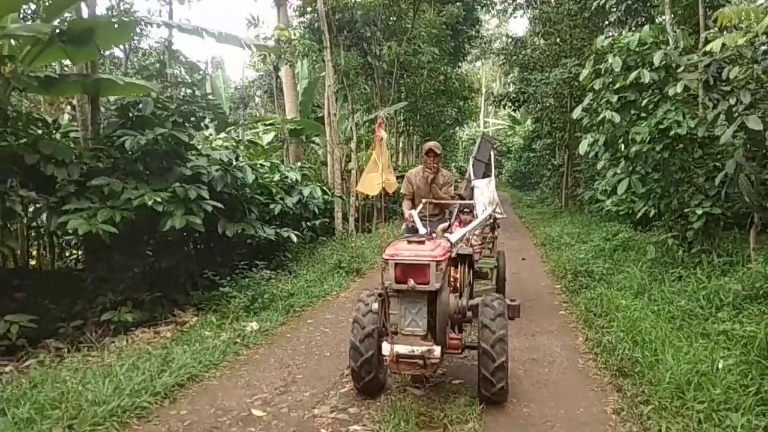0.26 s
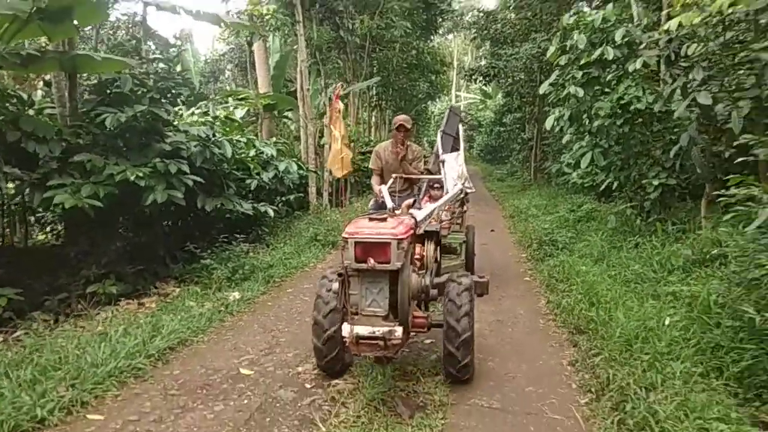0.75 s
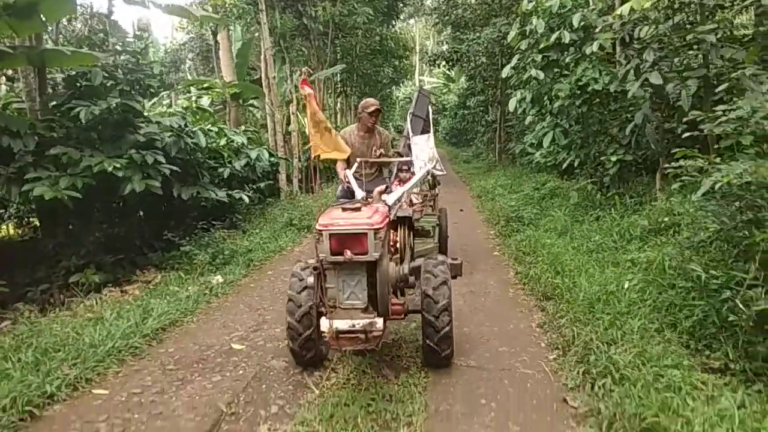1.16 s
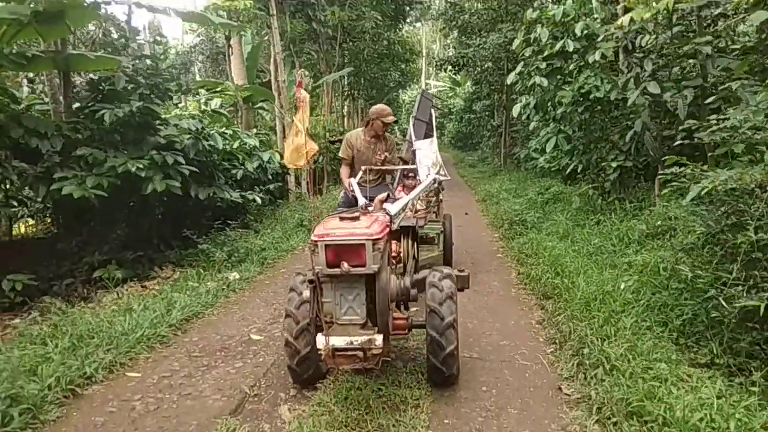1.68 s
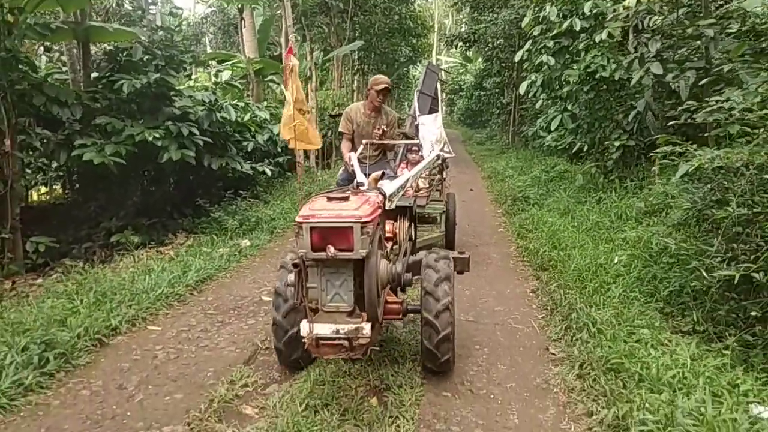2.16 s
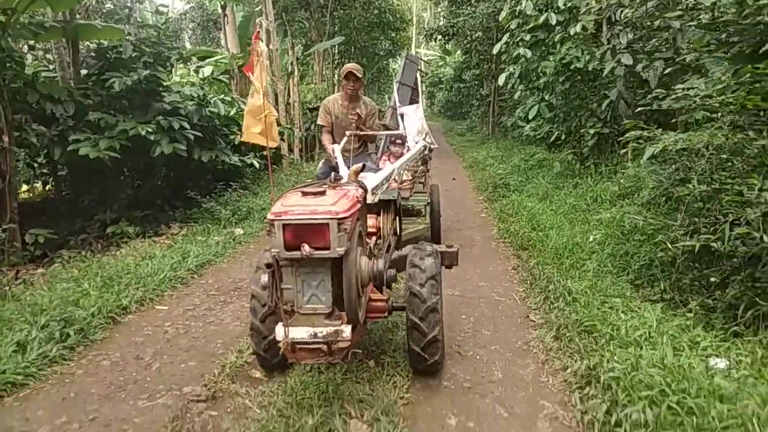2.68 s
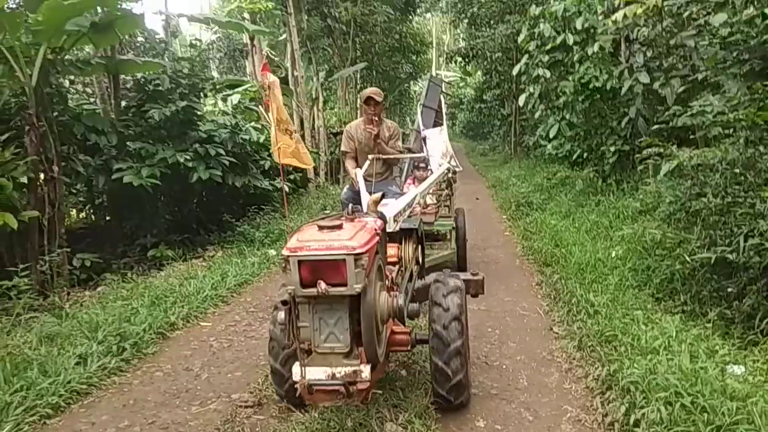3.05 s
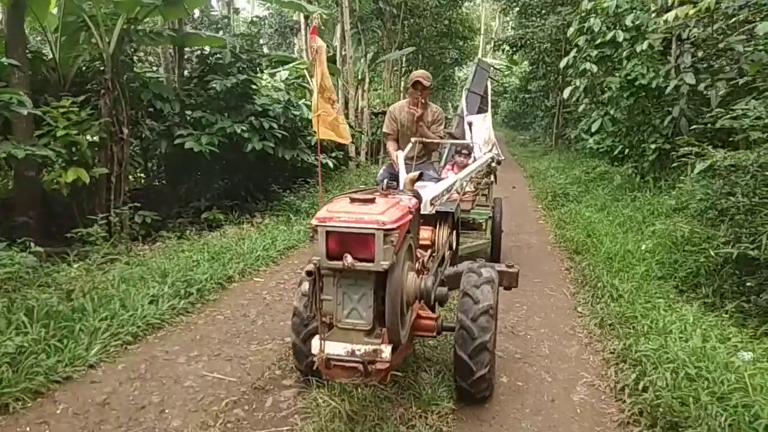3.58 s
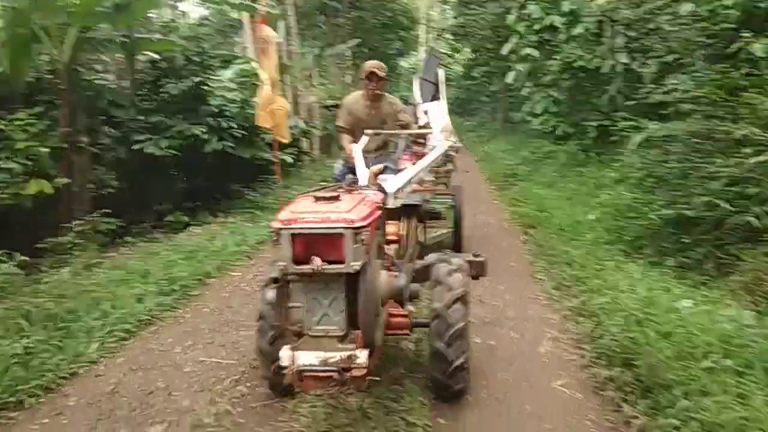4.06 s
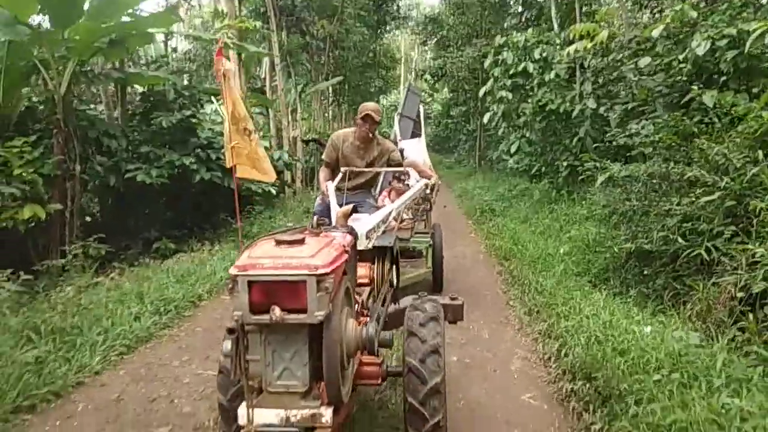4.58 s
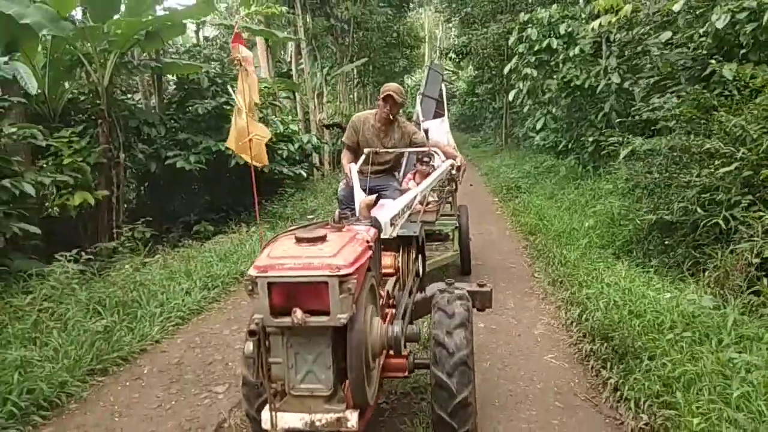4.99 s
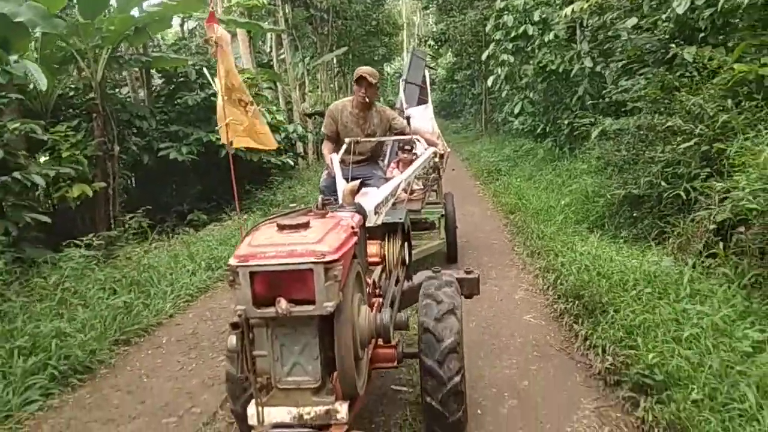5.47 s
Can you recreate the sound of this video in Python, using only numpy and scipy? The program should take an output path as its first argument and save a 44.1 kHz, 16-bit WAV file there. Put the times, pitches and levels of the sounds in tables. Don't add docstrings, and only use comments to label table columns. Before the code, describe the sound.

Close stereo phone pickup of an old diesel tractor creeping closer along a wooded path. Nearly five firing cycles per second alternate deep pipe thumps and clattering knocks, with intake pops and uneven hissing puffs between. A constant gritty mechanical wash, ringing loose metal and faint tyre rumble fill the gaps; the trees return only a short haze.

```python
import sys
import numpy as np
from scipy import signal
from scipy.fft import rfft, irfft, next_fast_len
from scipy.io import wavfile
from scipy.ndimage import uniform_filter1d

SR = 44100
rng = np.random.default_rng(int(sys.argv[2]) if len(sys.argv) > 2 else 0)


def magnitude_from_level(level_db):
    exponent = np.asarray(level_db, float) / 20
    return 10 ** exponent


def unload_wav(signal):
    wavfile.write(
        sys.argv[1],
        SR,
        np.round(np.clip(np.atleast_2d(signal).T, -1, 1) * 32767).astype(np.int16),
    )


N = 252804

LEAD = SR // 10
M = next_fast_len(N + 2 * LEAD)
HZ = np.arange(M // 2 + 1) * SR / M + 1e-3

# pitch_hz, fade_s (time to fall 60 dB), level_db
HEAD = [(446.3, 0.14, -11), (510.5, 0.066, -6.5), (680, 0.018, 0.5), (893, 0.02, -4)]
BLOCK = [(1125, 0.032, -2.5), (1340, 0.046, -3.5), (1424, 0.033, 2), (1604, 0.0051, 3.5)]
COVERS = [(2190, 0.0044, 1), (2463, 0.03, 0), (2678, 0.011, 0.5), (3045, 0.012, -4), (3740, 0.0042, -3.5)]
# pitch_hz, fade_s, level_db
HIGH_WHISTLE = [(4610, 0.0058, -1), (3650, 0.018, -15.5), (5107, 0.0094, -9.5)]
JET = [(7385, 0.016, -8.5), (8630, 0.0024, 2.5), (10170, 0.0017, 5), (11200, 0.0051, 0),
       (12750, 0.0013, -2.5)]
# time_s, level_db
NEAR = [(0.0, -44.5), (0.38, -44.5), (1.13, -44), (2.07, -43), (3.51, -42), (3.83, -41), (5.03, -41.5),
        (5.2, -41), (5.73, -42)]
# exhaust_opens_s, thump_db, whistle_db, jet_db
CYCLES = [(.0719, -17, -30.5, -35), (0.2875, -17.5, -38.5, -33), (0.5057, -17, -32, -29.5),
          (0.7221, -17, -34, -29), (0.9382, -16.5, -28, -25), (1.1575, -18.5, -34, -37),
          (1.381, -16, -31, -25), (1.5979, -16.5, -29.5, -27.5), (1.8125, -16.5, -34, -31),
          (2.0288, -15, -27.5, -25), (2.2418, -16.5, -34.5, -31), (2.4545, -16.5, -29, -31),
          (2.6662, -15.5, -28.5, -26), (2.8789, -16, -30, -26), (3.0896, -16, -30, -30.5),
          (3.3023, -14.5, -31.5, -26.5), (3.5136, -16.5, -30.5, -25), (3.7325, -15.5, -25.5, -26),
          (3.9499, -14.5, -28, -25), (4.163, -15.5, -29.5, -27), (4.3808, -16, -29, -27),
          (4.596, -15, -24.5, -27), (4.808, -15.5, -27.5, -30.5), (5.0204, -14.5, -27.5, -28.5),
          (5.2312, -15, -32, -23), (5.4369, -15.5, -26.5, -27), (5.6463, -15.5, -25, -28.5)]

INLET_OPENS_SHARE, INLET_SHUTS_SHARE, FIRES_SHARE = .294, .5925, .776
ENGINE_LAG_S, EXHAUST_LAG_S = 0.000435, 0.0002746


def curve(points):
    hz, value = np.transpose(points)
    return np.interp(np.log(HZ), np.log(hz), value)


def late(lag_s):
    lag_hz = 1620
    bend = HZ ** 2 / (HZ ** 2 + lag_hz ** 2)
    return np.exp(-2j * np.pi * HZ * lag_s * bend)


def at_ports(x, lag_s):
    left = irfft(rfft(x, M) * late(lag_s), M)
    return np.array([left, x])


def air(lag_s):
    # pitch_hz, share (0 to 1)
    likeness = [(100, 1), (400, 0.95), (1300, 0.7), (3500, 0.31), (9000, 0.19)]
    share = np.clip(curve(likeness), 0, 1)
    spectra = (rng.standard_normal((3, len(HZ), 2)) @ [1, 1j]) * np.sqrt(M / 2)
    common, *own = spectra
    both = np.array([common * late(lag_s), common])
    return irfft(np.sqrt(share) * both + np.sqrt(1 - share) * np.array(own), M)


def train(times, db, shape):
    x = np.zeros(M + len(shape))
    starts = np.round(np.asarray(times) * SR).astype(int) + LEAD
    for start, gain in np.broadcast(starts, magnitude_from_level(np.asarray(db))):
        x[start:start + len(shape)] += gain * shape
    return x[:M]


def puff(rise_s, fall_s):
    t = np.arange(int(SR * (rise_s + 7 * fall_s))) / SR
    shape = (1 - np.exp(-t / rise_s)) ** 2 * np.exp(-t / fall_s)
    return shape / shape.max()


def walk(rate):
    k = int(SR / rate)
    held = np.repeat(rng.standard_normal(M // k + 1), k)
    return 1.53 * uniform_filter1d(uniform_filter1d(held, k), k)[:M]


def mode(x, hz, t60):
    pole = np.exp(2j * np.pi * hz / SR - np.log(1000) / (t60 * SR))
    return signal.lfilter([0, pole.imag], [1, -2 * pole.real, abs(pole) ** 2], x)


def ring(x, modes):
    out = 0
    for k, (hz, t60, db) in enumerate(modes):
        scale = np.sqrt(4 * np.log(1000) / (t60 * SR))
        out = out + (-1) ** k * magnitude_from_level(db) * scale * mode(x, hz, t60)
    return out


def gas_column(times, db, pushes, modes):
    push = 0
    for delay, length, strength in pushes:
        bump = np.hanning(int(length * SR))
        push = push + train(times + delay, db, strength * bump / bump.sum())
    tone = sum(strength * mode(push, hz, t60) for hz, t60, strength in modes)
    return at_ports(tone, EXHAUST_LAG_S)


def cam(share):
    s = np.transpose(CYCLES)[0]
    s = np.r_[2 * s[0] - s[1], s, 2 * s[-1] - s[-2]]
    return s[:-1] + share * np.diff(s)


def trees(x, t60=.35, db=-12):
    t = np.arange(int(t60 * SR)) / SR
    haze = rng.standard_normal((2, len(t))) * 1000 ** (-t / t60) * (1 - np.exp(-t / 0.0014))
    haze = signal.sosfilt(signal.butter(1, [400, 9000], "band", fs=SR, output="sos"), haze)
    haze = haze / np.sqrt((haze ** 2).sum(1).mean())
    return magnitude_from_level(db) * signal.fftconvolve(x, haze, axes=1)[:, :M]


def jolts():
    return magnitude_from_level(3 * walk(80) + 1.5 * walk(10))


def rattle():
    # pitch_hz, level_db (per Hz)
    wash_colour = [(120, -22), (200, -3), (396, -5.5), (770, -6.5), (892, -9), (1900, -4.5), (2560, -7.5),
                   (3560, -10), (5250, -10.5), (6090, -12.5), (10200, -9), (15600, -14.5), (16500, -50)]
    # pitch_hz, fade_s, level_db
    tyre_rumble = [(45, .04, -16), (120, .04, -15)]
    # pitch_hz, fade_s, level_db
    panels = [(788, 0.047, -3), (990, 0.066, -1.5), (2520, 0.051, -2)]
    flicker = magnitude_from_level(0.56 * walk(8) + 1.72 * walk(150))
    wash = irfft(rfft(flicker * air(ENGINE_LAG_S)) * magnitude_from_level(curve(wash_colour)), M)
    band = signal.sosfilt(signal.butter(2, [400, 3000], "band", fs=SR, output="sos"), wash)
    out = wash / band.std() + ring(air(ENGINE_LAG_S), tyre_rumble)
    for modes, db in ((panels, -8), (HEAD + BLOCK, -12), (COVERS, -13)):
        out = out + ring(magnitude_from_level(db) * jolts() * air(ENGINE_LAG_S), modes)
    shake_db, shake_rise_s, shake_fall_s = -4.5, 0.027, 0.089
    shake = .75 + train(cam(FIRES_SHARE), shake_db, puff(shake_rise_s, shake_fall_s))
    s, db = np.transpose(NEAR)
    nearness = magnitude_from_level(np.interp((np.arange(M) - LEAD) / SR, s, db))
    return out * shake * nearness


def inlet():
    # delay_s, length_s, strength
    pop_pushes = [
        (-.0021, .0022, 1),
        (.0001, .0036, -3.17),
    ]
    shut_pushes = [
        (-.01, .0084, -1),
        (.0047, .0113, .39),
    ]
    # pitch_hz, fade_s, strength (minus turns it over)
    port_tones = [(135.5, .037, -.0435), (274, .062, -.029), (360, .03, -.008), (792, .06, .15),
                  (108, .2, .0135)]
    filter_tones = [(157.7, .24, .1), (131, .027, -.053)]

    open_s = cam(INLET_OPENS_SHARE)[1:]
    pop_db = 9.5 + 0.53 * np.transpose(CYCLES)[1]
    pop = gas_column(open_s, pop_db, pop_pushes, port_tones)
    gust = train(open_s + .015, pop_db - 47, puff(.008, .012))
    rush = ring(gust * air(ENGINE_LAG_S), HEAD + BLOCK)

    shut_s = cam(INLET_SHUTS_SHARE)[:-1]
    chance = rng.standard_normal((len(shut_s), 2)).T
    ring_db = -0.26 + .8 * chance[0]
    seat_db = -44.5 + 4 * chance[1]
    box = gas_column(shut_s, ring_db, shut_pushes, filter_tones)
    hiss = train(shut_s - .006, seat_db - 1.5, puff(0.0024, 0.0034))
    seat = ring(hiss * air(ENGINE_LAG_S), COVERS + HIGH_WHISTLE + JET)
    return pop + rush + box + seat


def pipe_gate():
    silenced = np.ones(int(.14 * SR))
    silenced[:150] = np.linspace(0, 1, 150)
    opens = cam(INLET_OPENS_SHARE)[1:]
    return 1 - train(opens - .0035, 0, silenced)


def exhaust():
    # delay_s, length_s, strength
    blowdown = [
        (-.0032, .0078, 1),
        (.0068, .0067, -1.36),
    ]
    # pitch_hz, fade_s, strength (minus turns it over)
    pipe_tones = [(100.3, .183, 1.51), (44, .037, -.66)]
    # pitch_hz, fade_s, level_db
    low_whistle = [(3224, 0.0091, -0.5), (2112, 0.02, -9.5), (1152, 0.015, -8.5)]
    # time_s, outflow_db
    long_blows = [(.939, -48), (1.381, -46), (1.598, -38), (2.029, -39), (2.455, -37), (2.667, -44),
                  (2.879, -47.5), (3.09, -52), (3.302, -55), (4.382, -50), (4.596, -40)]
    usual_flow_db = -56

    s, thump_db, whistle_db, jet_db = np.transpose(CYCLES)
    blow_s, blow_db = np.transpose(long_blows)
    out = gas_column(s, thump_db, blowdown, pipe_tones) * pipe_gate()
    # ringing, level of each cycle, gust gain dB, outflow gain dB
    voices = (
        (low_whistle, whistle_db, 2.4, -4),
        (HIGH_WHISTLE, whistle_db, 3.2, -5),
        (JET, jet_db, -2.6, -4))
    for modes, db, gain_db, flow_gain_db in voices:
        db = db + 1.4 * rng.standard_normal(len(s))
        second_db = db + gain_db - 7 + 3.5 * rng.standard_normal(len(s))
        gust = train(s + .0025, db + gain_db - 1, puff(.001, .004))
        gust = gust + train(s + .007, second_db, puff(.002, .004))
        stroke = puff(0.011, 0.057)
        flow = train(s + 0.029, usual_flow_db, stroke) + train(blow_s + 0.0085, blow_db, stroke)
        flow = magnitude_from_level(flow_gain_db) * flow
        sputter = magnitude_from_level(2.5 * walk(350) + 1.5 * walk(50))
        crack = train(s + .0045, db + gain_db + 12.5, np.hanning(5))
        blast = (gust + flow) * sputter * air(EXHAUST_LAG_S)
        out = out + ring(at_ports(crack, EXHAUST_LAG_S) + blast, modes)
    return out


def knock():
    # delay_s, head_db, block_db, covers_db
    slaps = [
        (0, -5, -1, -10),
        (.005, -10, -1, 0),
        (.0125, -10, -3, -10),
        (.030, -8, -11, -15),
    ]
    parts_db, scatter_db = (11.5, 10, 10), 1.77

    s = cam(FIRES_SHARE)[:-1]
    uneven = scatter_db * rng.standard_normal((len(s), 3))
    levels = np.interp(s, *np.transpose(NEAR)) + (uneven + parts_db).T
    chance = rng.standard_normal((len(s), len(slaps), 2))
    out = 0
    for part, (modes, db) in enumerate(zip((HEAD, BLOCK, COVERS), levels)):
        hit = 0
        scrape = train(s, db - 6, puff(0.0019, 0.014))
        for k, (delay, *slap_db) in enumerate(slaps):
            when = s + delay * (1 + 0.036 * chance[:, k, 0])
            size_db = db + slap_db[part] + 60 * delay * chance[:, k, 1]
            hit = hit + train(when, size_db + 10, np.hanning(7))
            scrape = scrape + train(when, size_db - 5, puff(.0003, .0012))
        out = out + ring(at_ports(hit, ENGINE_LAG_S) + scrape * air(ENGINE_LAG_S), modes)
    step = train(s - .0008, levels[0] + 7.0, -np.hanning(30) / 15)
    return out + at_ports(mode(step, 590, 0.011), ENGINE_LAG_S)


def scene():
    background = rattle()
    engine = inlet() + exhaust() + knock()
    return (engine + trees(engine) + background)[:, LEAD:LEAD + N]


def thin(x):
    from_hz, most, floor_db = 3000, .6, -20
    mid_side = np.array([x[0] + x[1], x[0] - x[1]]) / 2
    hz, _, cells = signal.stft(mid_side, SR, nperseg=1024)
    power = uniform_filter1d(abs(cells) ** 2, size=2, axis=1)
    power = uniform_filter1d(power, size=3, axis=2) + 1e-20
    share = most * np.clip(hz / from_hz - .5, 0, 1)[:, None]
    around = uniform_filter1d(power, size=21, axis=1)
    gain = np.clip(1 - share * around / power, magnitude_from_level(2 * floor_db), 1)
    mid, side = signal.istft(cells * np.sqrt(gain), SR, nperseg=1024)[1][:, :N]
    return np.array([mid + side, mid - side])


def top_cut(x):
    return signal.sosfilt(signal.butter(12, 16840, fs=SR, output="sos"), x)


def record(dry):
    # pitch_hz, left_minus_right_db
    balance = [(150, .2), (300, .9), (1000, .3), (2500, 1.6), (5000, -.2), (10000, 0)]
    tilt = magnitude_from_level(curve(balance) / 2)
    ports = irfft(rfft(dry, M) * [tilt, 1 / tilt], M)[:, :N]
    top_hz = 15800
    low_pass = signal.ellip(8, .3, 70, top_hz, fs=SR, output="sos")
    return top_cut(signal.sosfilt(low_pass, thin(ports)))


dry = scene()
out = record(dry)
unload_wav(out)
```